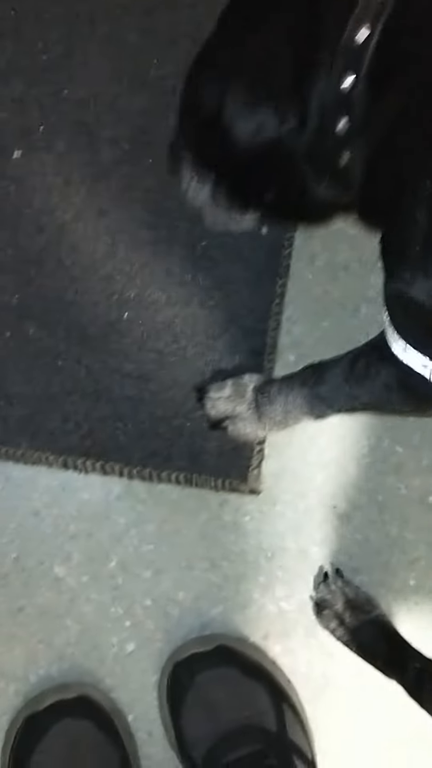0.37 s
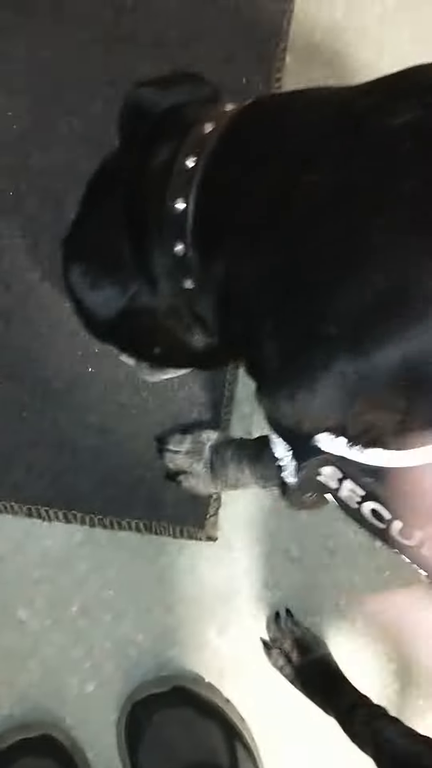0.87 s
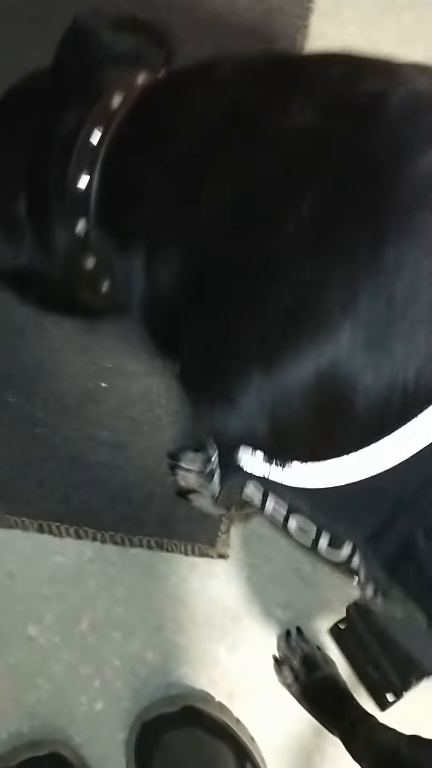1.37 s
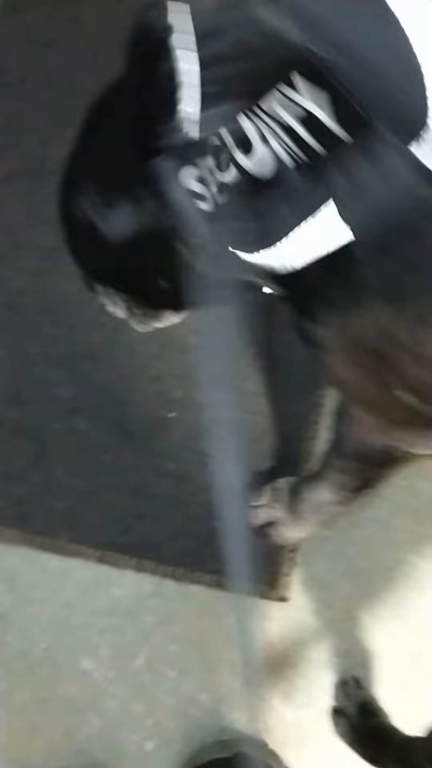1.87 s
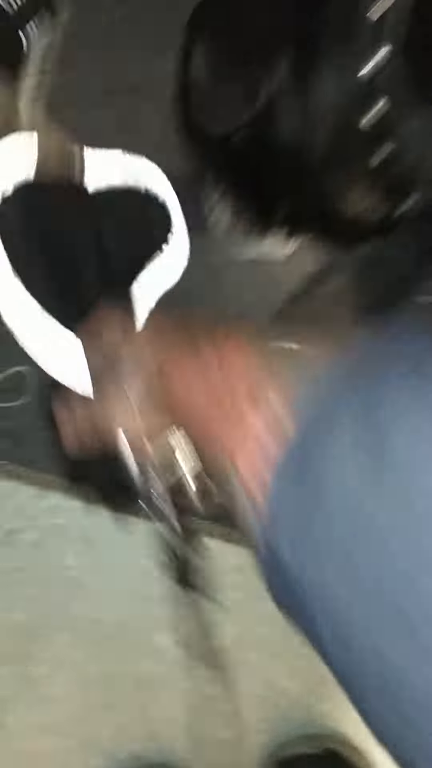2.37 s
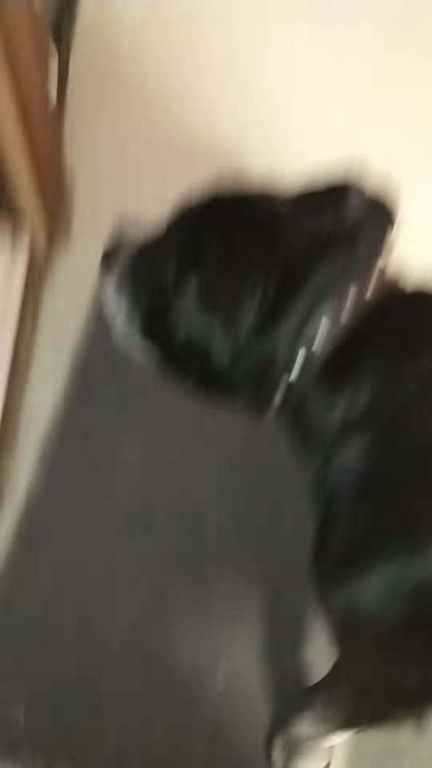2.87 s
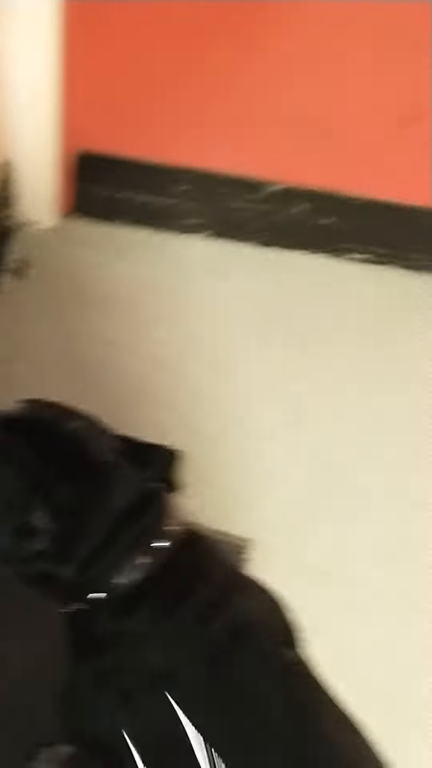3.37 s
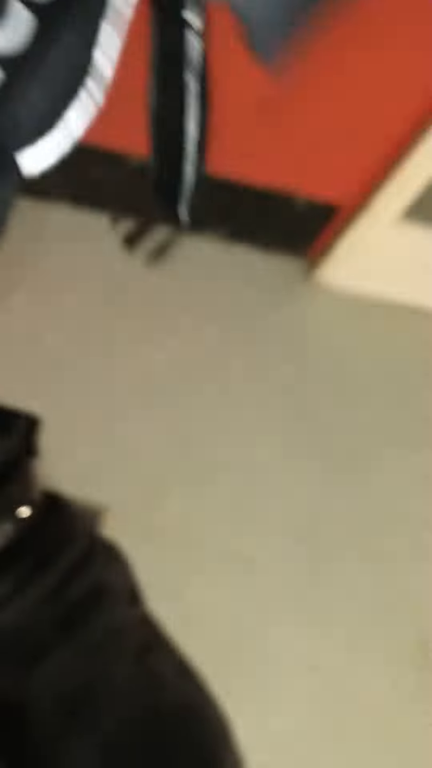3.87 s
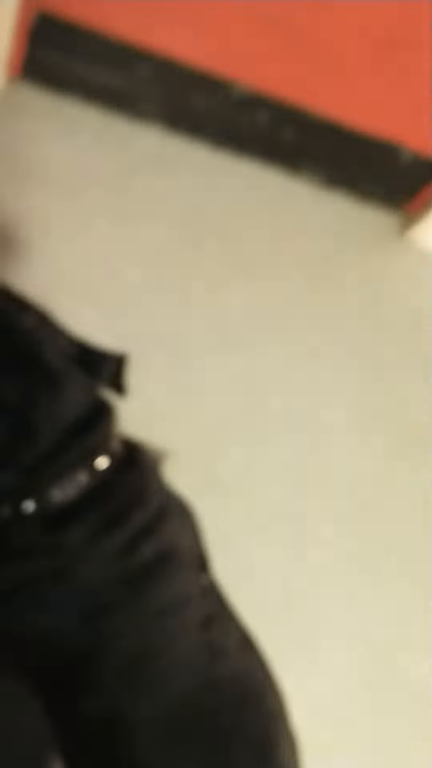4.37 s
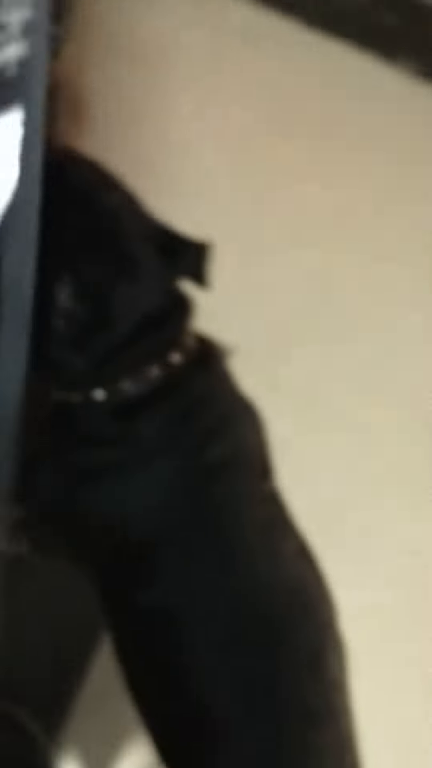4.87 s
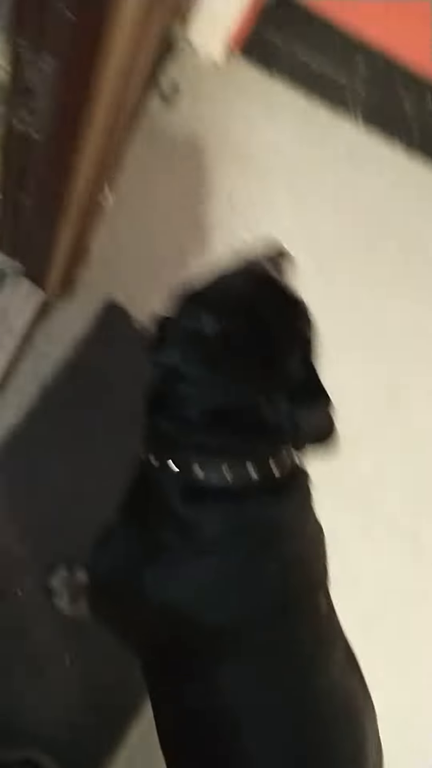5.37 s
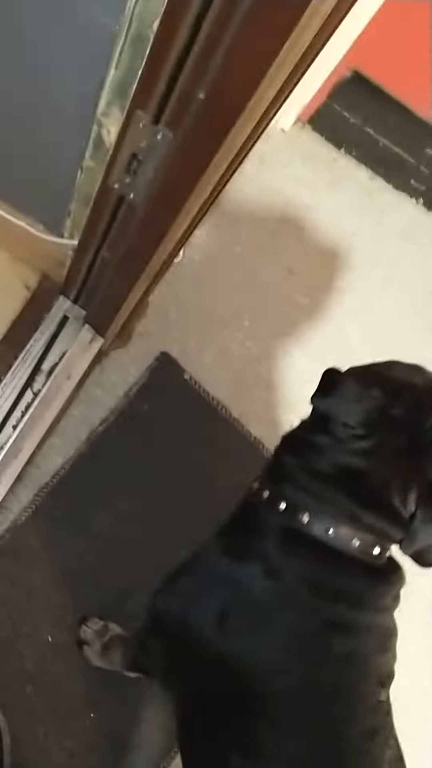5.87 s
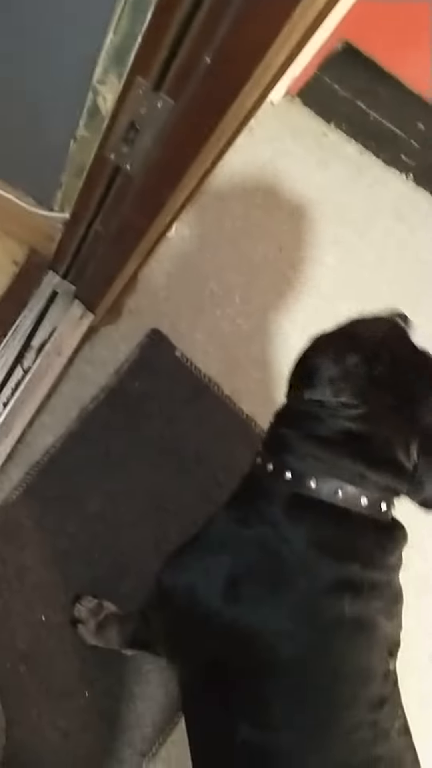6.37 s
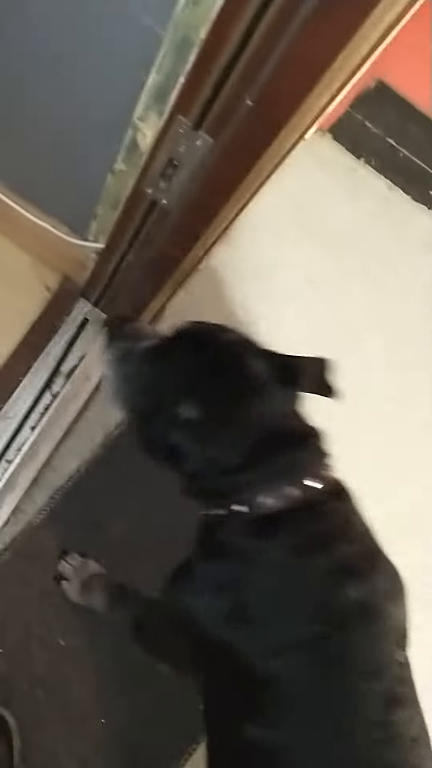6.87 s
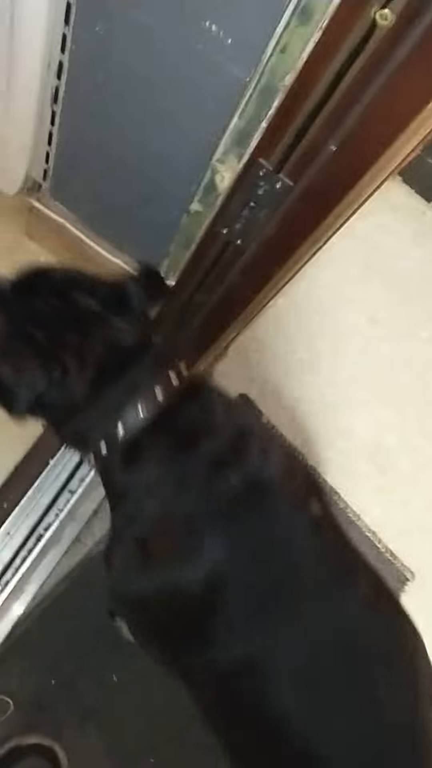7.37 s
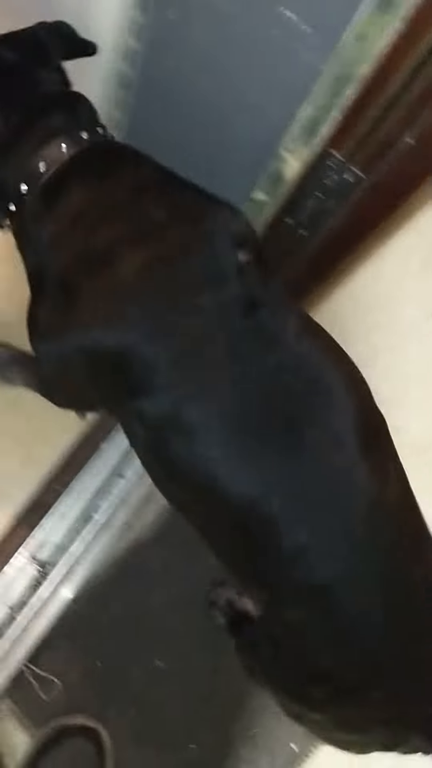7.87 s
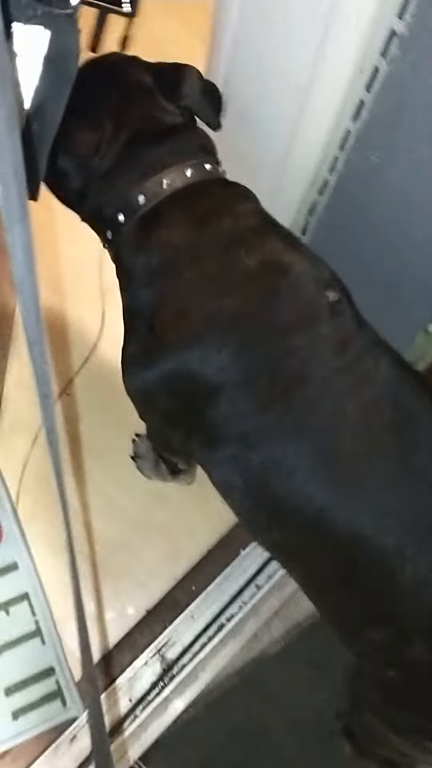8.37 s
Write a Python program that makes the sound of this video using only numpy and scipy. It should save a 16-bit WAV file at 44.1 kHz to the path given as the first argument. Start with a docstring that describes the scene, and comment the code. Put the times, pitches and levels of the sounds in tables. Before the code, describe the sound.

Buckles clack and webbing rustles as a dog's harness comes off, a hard drop, then a door drags and bangs, and claws tick.

```python
"""Dog's harness off, by a hall door

In a hard-floored hall a harness comes off a dog: webbing rustles, buckles and rings clack, a strap slides.
Then the door is dragged and knocked, and the dog steps over the sill, claws and pads on the floor.
Contacts and their tails are dying noise through resonances, rubbing is dense grains, clinks are dying sines.
The hall answers with dense noise reflections; one small mono microphone rounds peaks and cuts the top.
The recorder's noise gate turns some dying tails down."""
import sys
import numpy as np
from scipy import signal
from scipy.fft import rfft, irfft
from scipy.io import wavfile

SR = 44100
rng = np.random.default_rng(int(sys.argv[2]) if len(sys.argv) > 2 else 0)


def unload_wav(signal):
    """Save mono or channel-first audio to the path in sys.argv[1] as 16-bit WAV at rate SR, clipped to [-1, 1]."""
    wavfile.write(
        sys.argv[1],
        SR,
        np.round(np.clip(np.atleast_2d(signal).T, -1, 1) * 32767).astype(np.int16),
    )


def nominal_scale(level):
    """Amplitude ratio for a level in decibels (scalar or array-like)."""
    x = np.asarray(level, float) / 20
    return 10 ** x


N = 374409

# steady hush of the building: (frequency [Hz], spectrum level [dB])
AIR_SPECTRUM = [(18, -33), (30, -5.5), (54, -1.5), (70, -2.5), (276, 3.5), (357, -11.5), (755, -9.5),
                (7290, -19.5), (8000, -30), (10400, -90.5)]
AIR_DB = -70
# reverberation of the hall: (frequency [Hz], t60 [s])
HALL_DECAY = [(100, 0.95), (300, 0.85), (1000, 0.67), (2700, 0.6), (5000, 0.31), (8000, 0.32)]
# hollow boom of door and hall: (frequency [Hz], width [Hz], relative level [dB])
BOOM_MODES = [(135.2, 18, 10), (186.2, 18, 4), (240, 12, -17.5)]
# door leaf and fittings: (frequency [Hz], width [Hz], relative level [dB])
DOOR_MODES = [(830, 61, 4.5), (1010, 590, -8), (1322, 65, 0.5), (2730, 2700, -6), (2420, 42, 6.5),
              (2480, 60, -0.5), (2714, 26, 7), (2780, 54, -2), (4430, 60, -4.5)]
# stiff webbing: (frequency [Hz], width [Hz], relative level [dB])
WEBBING_MODES = [(6400, 55, 13.5), (7240, 370, 0), (6700, 950, 0.5)]
# soft pads and shoes shift their weight, heard only as a low push: (time [s], level [dB])
WEIGHT_SHIFTS = [(0.645, -41.5), (0.828, -42), (1.38, -52), (1.652, -36.5), (1.882, -36), (1.928, -36.5),
                 (2.064, -40.5), (5.012, -24.5), (5.825, -49), (7.54, -44.5), (7.982, -34)]
# dying tones and noise bands: strap and clink tails, door creak, hums after heavy blows:
# (time [s], frequency [Hz], width [Hz], level [dB], t60 [s])
TAIL_MODES = [(0.557, 1430, 300, -38, 0.29), (0.645, 1870, 343, -38, 0.94), (1.117, 4190, 109, -24.5, 0.16),
              (2.326, 520, 100, -36.5, 1.9), (2.33, 1250, 1200, -37.5, 2.4), (4.37, 752, 90, -24.5, 0.56),
              (4.369, 2400, 900, -22.5, 0.17), (4.369, 850, 606.4, -21, 0.53),
              (4.369, 170, 119.1, -39.5, 0.85), (5.375, 900, 150, -42.5, 0.3),
              (5.591, 2420, 1520, -38.5, 0.22), (5.908, 1560, 1520, -28, 0.22),
              (5.911, 185, 50, -31.5, 0.65), (6.086, 2520, 900, -24, 0.3), (6.081, 1285, 45, -31.5, 0.5),
              (6.085, 306, 300, -27, .8), (6.086, 4570, 2400, -53, 1.0), (6.085, 195, 60.2, -34.5, 0.64),
              (6.085, 776, 50, -25.5, 0.5), (7.205, 240, 180, -42, 0.98), (7.207, 1480, 1940, -39.5, 0.32),
              (7.99, 217, 100.6, -44, 0.33)]
# the recorder's noise gate turns the dying tails down: (time [s], change of level [dB])
GATE_STEPS = [(2.955, -22), (7.364, -10)]
# hands work the harness off the dog: (time [s], swish [dB], treble [dB], rumble [dB])
HANDLING_LEVELS = [(0.0, -64, -63, -65), (0.59, -59, -66.5, -62), (0.75, -56, -47, -53.5),
                   (0.95, -66, -55, -59.5), (1.35, -78.5, -46, -67.5), (1.58, -61, -51.5, -63),
                   (1.7, -54, -47, -53), (1.82, -47, -50, -52), (1.96, -48.5, -52.5, -52),
                   (2.13, -53, -53, -50.5), (2.36, -54, -63.5, -69.5), (2.5, -36.5, -46, -52),
                   (2.63, -72, -66, -53), (2.77, -48, -62, -52.5), (2.97, -55, -66, -59.5),
                   (3.35, -58.5, -66.5, -75), (3.64, -61, -71, -68), (3.77, -52, -65.5, -65),
                   (4.02, -55, -63.5, -71), (4.16, -56, -64.5, -63), (4.33, -63, -70, -69)]
# the harness is gathered up and the door dragged open: (time [s], scrape [dB], treble [dB], rumble [dB])
DRAG_LEVELS = [(4.33, -66, -63, -68), (4.542, -37.5, -50, -69), (4.606, -34, -58, -51),
               (4.728, -43, -57.5, -80), (4.946, -44, -65, -44), (5.064, -38.5, -66, -33.5),
               (5.104, -39, -39.5, -56), (5.15, -31, -40.5, -31.5), (5.215, -43.5, -42, -50),
               (5.25, -46, -59, -49.5), (5.458, -52.5, -57, -54), (5.68, -74, -65.5, -57),
               (5.882, -64, -71, -88), (6.034, -68, -71.5, -49), (6.1, -21.5, -55, -50)]
# the dog's coat brushes past the frame: (time [s], swish [dB], rumble [dB])
COAT_LEVELS = [(7.25, -78, -74), (7.452, -73.5, -72), (7.698, -64, -67), (7.806, -63, -67),
               (8.002, -78.5, -84), (8.11, -70.5, -64.5), (8.49, -76.5, -78.5)]
# quick strokes of cloth and fur:
# (time [s], level [dB], ring [Hz], treble [dB], ring level [dB], rattle t60 [s])
CLOTH_STROKES = [(.25, -33.5, 3770, 1, -34, 0.3), (1.645, -41, 910, -9, 2, 0.077),
                 (3.595, -29.5, 4150, -9, 2, 0.17), (3.72, -37.5, 990, -1, -3, 0.33)]
# paws on sill and floor: (time [s], level [dB], ring [Hz], treble [dB], thud [dB], rattle t60 [s])
PAW_STEPS = [(7.204, -22, 1270, -15, -17.5, 0.13), (7.543, -37, 726, -10.5, -10, 0.043),
             (7.589, -27.5, 1550, -3.5, -57.5, 0.032), (7.983, -51, 940, -13, -4, 0.056),
             (7.997, -38, 954, 4, -12, 0.06), (8.316, -43, 1240, -5, -29.5, 0.079)]
# the first paw rings the metal sill: (frequency [Hz], level [dB], t60 [s])
SILL_MODES = [(818, -42, 0.67), (1260, -39.5, 0.32), (2010, -50.5, 0.68), (2195, -46, 0.47),
              (2850, -41, 0.27), (3880, -46, 0.24), (4460, -44, .24), (5250, -57, 0.36), (6460, -52, 0.16)]
# door, handle and latch: (time [s], level [dB], treble [dB], thud [dB])
DOOR_KNOCKS = [(4.724, -28.5, -12, -16), (4.865, -35, -32, -31), (4.892, -28, -16, -15),
               (4.905, -22.5, -14, -8.5), (4.962, -28.5, -21, 5), (5.024, -18.5, -16, -14.5),
               (5.044, -23, -22, -9.5), (5.09, -13, -15, -19.5), (5.106, -20.5, -19, -23.5),
               (5.14, -22.5, 5, -35.5), (5.199, -25.5, -36, -24), (5.27, -36.5, -24, -25),
               (5.291, -30.5, -22, -18), (5.418, -38.5, -31, -7), (5.586, -22.5, -25, -21),
               (5.826, -50, -15.5, 10), (5.89, -33.5, -12, -12.5)]
# the door meets its stop and frame:
# (time [s], level [dB], ring [Hz], treble [dB], thud [dB], rattle t60 [s])
DOOR_BANGS = [(5.908, -21.5, 1370, 4.5, -23, 0.059), (6.083, -5, 1306, -18.5, -39.5, 0.09)]
# a strap slides through its buckle: (time [s], resonance [Hz], level [dB])
STRAP_SLIDE = [(0, 2330, -65), (0.253, 2270, -60), (.5, 2280, -73)]
# the harness lands on the hard floor:
# (time [s], level [dB], ring [Hz], treble [dB], ring level [dB], rattle t60 [s])
LANDINGS = [(2.322, -11.5, 488, -2.5, 11, 0.079), (4.365, -12.5, 822, -5.5, 5.5, 0.25)]
# small metal parts touch and ring clearly: (time [s], frequency [Hz], level [dB], t60 [s])
METAL_TOUCHES = [(.482, 3730, -55, .08), (.556, 3610, -44, 0.068), (.582, 3560, -42, 0.045),
                 (0.707, 3750, -41, 0.13), (1.589, 7540, -35, 0.18), (1.94, 3500, -37, 0.042),
                 (1.94, 5250, -53.5, 0.045), (2.068, 5150, -63, .08), (2.078, 4000, -37, 0.085),
                 (3.265, 5250, -47, 0.058)]
# buckles and rings: (time [s], level [dB], ring [Hz], treble [dB])
BUCKLE_CLACKS = [(0.5574, -23, 1950, -11.5), (0.5837, -31.5, 3600, -12), (0.6442, -17, 1490, -8),
                 (0.7471, -27.5, 2950, -13), (0.877, -38, 3700, -16), (0.909, -40.5, 2840, -5),
                 (1.013, -31.5, 1540, -33), (1.088, -29, 2500, 5.5), (1.112, -26.5, 4360, 2.5),
                 (1.212, -35.5, 6700, -27), (1.3048, -49.5, 6300, 8), (1.332, -33, 6450, 5),
                 (1.3763, -45, 6500, 8), (1.5227, -28.5, 6470, 9), (1.5834, -33.5, 7600, 7.5),
                 (1.715, -32, 7500, -18), (1.7547, -30, 960, -14.5), (1.7846, -30.5, 6500, -8.5),
                 (1.7947, -30.5, 3900, -8), (1.8445, -26.5, 1690, -11), (1.866, -29, 6900, -11),
                 (1.8827, -21, 3150, 1), (1.9364, -31, 5260, 9.5), (2.023, -21, 1980, -4),
                 (2.032, -28, 4100, -10), (2.0448, -28, 4060, 1), (2.0698, -28, 4830, -33),
                 (2.0874, -36, 3520, 1.5), (2.1, -21, 2160, -4), (2.1857, -45.5, 3650, 7),
                 (2.3167, -25.5, 2000, -4), (2.4761, -12, 1900, -15.5), (2.488, -25.5, 4100, -13.5),
                 (2.811, -32, 3510, -1.5), (2.86, -20.5, 1290, -16), (3.265, -41.5, 5000, -1),
                 (3.606, -31.5, 1520, 3), (4.157, -37.5, 895, 3.5)]


def rms_one(x):
    """Scale to rms 1."""
    return x / np.sqrt(np.mean(x ** 2) + 1e-20)


def band(x, low_hz, high_hz):
    """Butterworth band-pass."""
    sos = signal.butter(2, [low_hz, high_hz], "band", fs=SR, output="sos")
    return signal.sosfilt(sos, x + 1e-18)


def at_hz(points, hz):
    """Read a table on a log-frequency axis."""
    table_hz, values = np.array(points).T
    return np.interp(np.log(hz), np.log(table_hz), values)


def resonance(x, hz, width_hz):
    """Two-pole resonance with gain 1 on top."""
    r = np.exp(-np.pi * width_hz / SR)
    poles = [1, -2 * r * np.cos(2 * np.pi * hz / SR), r * r]
    return signal.lfilter([(1 - r * r) / 2, 0, (r * r - 1) / 2], poles, x + 1e-18)


def modes(x, table):
    """A body's resonances side by side, each at its own level."""
    return sum(nominal_scale(db) * resonance(x, hz, width_hz) for hz, width_hz, db in table)


def drift(rate_hz):
    """Slow chance: random knots of spread 1, joined by straight lines."""
    knots = rng.standard_normal(4000)
    return np.interp(np.arange(N) / SR * rate_hz, np.arange(len(knots)), knots)


def levels(rows):
    """Gains of the dB columns over time; near silence outside the table."""
    s, *columns = np.transpose(rows)
    t = np.arange(N) / SR
    return [nominal_scale(np.interp(t, s, column, left=-120, right=-120)) for column in columns]


def contacts(rows, ring_width_hz, rise_s, thud_t60, thud_db):
    """A blow is a dying rattle split into body and treble, a ring and a low push; also returns the raw body.

    Rows: (time [s], level [dB], ring [Hz], treble [dB], ring level [dB], thud [dB], rattle t60 [s])."""
    body, treble, push, rings = np.zeros((4, N + SR))
    t = np.arange(SR // 3) / SR
    noise = rng.standard_normal((len(rows), len(t)))
    for (s, db, hz, treble_db, ring_db, low_db, t60), hiss in zip(rows, noise):
        start = round(s * SR)
        span = slice(start, start + len(t))
        rattle = nominal_scale(db - 60 * t / max(t60, .003)) * hiss * np.minimum(t / rise_s, 1)
        body[span] += rattle
        treble[span] += rattle * nominal_scale(treble_db)
        ring = resonance(resonance(rattle, hz, ring_width_hz), hz, 3 * ring_width_hz)
        rings[span] += ring * nominal_scale(ring_db)
        push[span] += nominal_scale(db + low_db + thud_db - 60 * t / thud_t60) * hiss[::-1]
    boom = modes(push, BOOM_MODES) + nominal_scale(-18.5) * band(push, 120, 530)
    middle = nominal_scale(-2.5) * band(band(body, 490, 2900), 160, 2500)
    top = nominal_scale(2.0) * band(treble, 2900, 6900)
    return (middle + top + rings + band(boom, 76, 1900))[:N], body[:N]


def air():
    """Steady hush of the building: noise shaped in frequency."""
    hz = np.maximum(np.arange(N // 2 + 1) * SR / N, 1)
    spectrum = rfft(rng.standard_normal(N)) * nominal_scale(at_hz(AIR_SPECTRUM, hz))
    return nominal_scale(AIR_DB) * rms_one(irfft(spectrum, N))


def hall(x):
    """Dense reflections: half-octave bands of noise, each dying at its own rate."""
    t = np.arange(SR) / SR
    edges = 60 * 2 ** np.arange(0, 7.6, .5)
    white = rng.standard_normal((2, SR))
    echo = np.zeros(SR)
    for k, (low, high) in enumerate(zip(edges, edges[1:])):
        t60 = at_hz(HALL_DECAY, np.sqrt(low * high))
        echo += band(white[k % 2], low, high) * nominal_scale(-60 * t / t60)   # neighbours use separate noise
    echo *= np.clip((t - .003) / 0.006, 0, 1)   # the first walls answer after a few ms
    return signal.fftconvolve(x, echo / np.sqrt(np.sum(echo ** 2)))[:N]


def thumps():
    """Each shift of weight is a short puff of noise into the low modes."""
    rise_s, t60_s = 0.012, 0.19
    push, t = np.zeros(N + SR), np.arange(SR // 4) / SR
    noise = rng.standard_normal((len(WEIGHT_SHIFTS), len(t)))
    for (s, db), hiss in zip(WEIGHT_SHIFTS, noise):
        envelope = nominal_scale(db - 60 * t / t60_s) * np.minimum(t / rise_s, 1)
        start = round(s * SR)
        push[start:start + len(t)] += envelope * rms_one(modes(hiss, BOOM_MODES))
    return push[:N]


def tails():
    """Dying noise in one resonance each, turned down in steps by the recorder's noise gate."""
    out, t = np.zeros(N + SR), np.arange(SR) / SR
    noise = rng.standard_normal((len(TAIL_MODES), SR))
    for (s, hz, width_hz, db, t60), hiss in zip(TAIL_MODES, noise):
        tone = rms_one(resonance(resonance(hiss, hz, width_hz), hz, 2 * width_hz))
        gate_db = sum(step_db * np.clip((s + t - at) / 0.0099, 0, 1) for at, step_db in GATE_STEPS if at > s)
        envelope = nominal_scale(db + gate_db - 60 * t / t60) * np.minimum(t / 0.01, 1)
        start = round(s * SR)
        out[start:start + SR] += envelope * tone
    return out[:N]


def rubbing():
    """Fibres catch and slip as dense grains; stiff webbing colours the treble; movement rumbles below."""
    hands, hands_treble, hands_rumble = levels(HANDLING_LEVELS)
    drag, drag_treble, drag_rumble = levels(DRAG_LEVELS)
    coat, coat_rumble = levels(COAT_LEVELS)

    slips = rng.random(N) < 1500 * nominal_scale(5.0 * drift(25.0)) / SR
    sizes = nominal_scale(0.87 * np.minimum(rng.exponential(1, N), 5))
    grains = slips * sizes * rng.choice([-1, 1], N)
    fibres = rms_one(grains) + 0.26 * rng.standard_normal(N)
    reversed_fibres = fibres[::-1]   # keeps the treble grains apart from the swish

    fine = band(reversed_fibres, 3400, 8800)
    webbing = fine + modes(fine, WEBBING_MODES)
    # small snags in the webbing, each a dying burst of noise
    snags_per_s, snag_db, snag_t60_s = 400, -14.5, 0.068   # rate before drift; level against the hiss
    hits = rng.random(N) < snags_per_s * nominal_scale(6.0 * drift(8.0)) / SR
    hits = hits * nominal_scale(2.2 * np.minimum(rng.exponential(1, N), 4))
    snag_envelope = signal.lfilter([1], [1, -nominal_scale(-60 / (snag_t60_s * SR))], hits + 1e-18)
    snags = band(snag_envelope * rng.standard_normal(N), 2900, 12000)
    treble = rms_one(webbing) + nominal_scale(snag_db) * rms_one(snags)

    scrape = band(band(fibres, 420, 1500), 330, 2800)
    scrape = scrape + modes(scrape, DOOR_MODES)
    swish = band(band(fibres, 450, 4100), 230, 6200)
    drag_hiss = band(reversed_fibres, 2800, 6500)
    coat_treble = nominal_scale(-10) * coat
    rub = drag * rms_one(scrape) + (hands + coat) * rms_one(swish)
    rub = rub + (hands_treble + coat_treble) * rms_one(treble) + drag_treble * rms_one(drag_hiss)

    low = rng.standard_normal(N)
    rumble = modes(low, BOOM_MODES) + nominal_scale(-14.0) * band(low, 60, 230)
    rumble_gain = (hands_rumble + drag_rumble + coat_rumble) * nominal_scale(1.0 * drift(28.0))
    return nominal_scale(1.7 * drift(45.0)) * rub + rumble_gain * rms_one(rumble)


def strokes():
    """Cloth and fur swept by quickly: slowly rising noise bursts, kept dry."""
    rows = np.insert(CLOTH_STROKES, 5, [-47, 2.5, -34, -19], axis=1)   # thud [dB] of each
    return contacts(rows, ring_width_hz=910, rise_s=0.027, thud_t60=0.24, thud_db=8.0)[0]


def paws():
    """Claws rattle and ring briefly while the pads push the floor."""
    rows = np.insert(PAW_STEPS, 4, 3.0, axis=1)   # ring level [dB]
    return contacts(rows, ring_width_hz=230, rise_s=0.0016, thud_t60=0.048, thud_db=22.0)[0]


def sill():
    """The metal strip under the first paw rings in dying modes."""
    clock = np.arange(N) / SR
    t = np.maximum(clock - PAW_STEPS[0][0], 0)
    gate_s, gate_db = GATE_STEPS[-1]   # the recorder's noise gate turns the sill down along with the tails
    ring = sum(nominal_scale(db - 60 * t / t60) * np.sin(2 * np.pi * hz * t) for hz, db, t60 in SILL_MODES)
    return ring * nominal_scale(2.0 * drift(60.0) + gate_db * (clock > gate_s))


def door():
    """Knocks and bangs also shake the door leaf and its fittings."""
    ring_hz, ring_db, t60_s = 1600, 2, 0.043   # shared by all knocks
    rows = [(s, db, ring_hz, treble_db, ring_db, low_db, t60_s) for s, db, treble_db, low_db in DOOR_KNOCKS]
    knocks, light = contacts(rows, ring_width_hz=1100, rise_s=0.00099, thud_t60=0.13, thud_db=19.5)
    rows = np.insert(DOOR_BANGS, 4, 0.0, axis=1)   # ring level [dB]
    bangs, heavy = contacts(rows, ring_width_hz=110, rise_s=0.0025, thud_t60=0.15, thud_db=34.0)
    leaf = nominal_scale(6.0) * modes(nominal_scale(-7.0) * light + heavy, DOOR_MODES)
    return knocks + bangs + band(leaf, 330, 4400)


def strap(width_hz):
    """Friction of the sliding strap: a narrow band of noise carried on a moving resonance."""
    s, hz, db = np.transpose(STRAP_SLIDE)
    t = np.arange(N) / SR
    phase = 2 * np.pi * np.cumsum(np.interp(t, s, hz)) / SR
    low_pass = signal.butter(2, width_hz, fs=SR, output="sos")
    a, b = signal.sosfilt(low_pass, rng.standard_normal((2, N)))
    gain = nominal_scale(np.interp(t, s, db, right=-120) + 2.5 * drift(40.0))
    return gain * rms_one(a * np.cos(phase) + b * np.sin(phase))


def landings():
    """The harness hits the hard floor: strong rattles with a ring and a low push."""
    rows = np.insert(LANDINGS, 5, -28.0, axis=1)   # thud [dB]
    return contacts(rows, ring_width_hz=310, rise_s=0.0019, thud_t60=0.5, thud_db=18.0)[0]


def clinks():
    """Each metal touch rings as a close, beating pair of modes."""
    out, t = np.zeros(N + SR), np.arange(SR // 4) / SR
    chances = rng.random((len(METAL_TOUCHES), 2))
    for (s, hz, db, t60), (split, phase) in zip(METAL_TOUCHES, chances):
        partner_hz = hz * (1.01 + 0.02 * split)
        pair = np.sin(2 * np.pi * hz * t) + 0.95 * np.sin(2 * np.pi * (partner_hz * t + phase))
        start = round(s * SR)
        out[start:start + len(t)] += nominal_scale(db - 60 * t / t60) * pair * np.minimum(t / 0.0014, 1)
    return out[:N] * nominal_scale(4.0 * drift(150.0))   # loose parts chatter


def harness():
    """Buckle and ring clacks share one rattle length; smaller parts ring higher and more clearly."""
    s, db, hz, treble_db = np.transpose(BUCKLE_CLACKS)
    ring_db = 1.5 + 4.5 * np.log2(hz / 1000)   # level at 1 kHz, rise per octave
    thud_db, t60_s = np.full(len(s), -35.5), np.full(len(s), 0.032)
    rows = np.transpose([s, db, hz, treble_db, ring_db, thud_db, t60_s])
    clacks = contacts(rows, ring_width_hz=750, rise_s=0.00028, thud_t60=0.026, thud_db=11.0)[0]
    return clacks + clinks()


def scene():
    """Harness, landings, door and paws each have their own hall level; all other sounds stay dry."""
    clacks, drops, knocks, steps = harness(), landings(), door(), paws()
    wet = hall(nominal_scale(-8.0) * clacks + nominal_scale(-5.5) * drops + nominal_scale(-7.5) * knocks + nominal_scale(-8.5) * steps)
    blows = clacks + drops + knocks + steps + strokes()
    after = tails() + sill() + thumps() + wet
    return (blows + after + rubbing() + strap(width_hz=140) + air())[None]


def band_limit(x):
    """A steep low-pass at the top of the band."""
    return signal.sosfilt(signal.butter(12, 8880, fs=SR, output="sos"), x)


def record(dry):
    """A small microphone: thin deep bass, rounded peaks, a steep top cut."""
    bass_cut = signal.butter(2, 45, "high", fs=SR, output="sos")
    thin = signal.sosfilt(bass_cut, dry)
    rounded = 0.77 * np.tanh(thin / 0.8)
    top_cut = signal.cheby1(10, .5, 7710, fs=SR, output="sos")
    return band_limit(signal.sosfilt(top_cut, rounded))


dry = scene()
out = record(dry)
unload_wav(out)
```